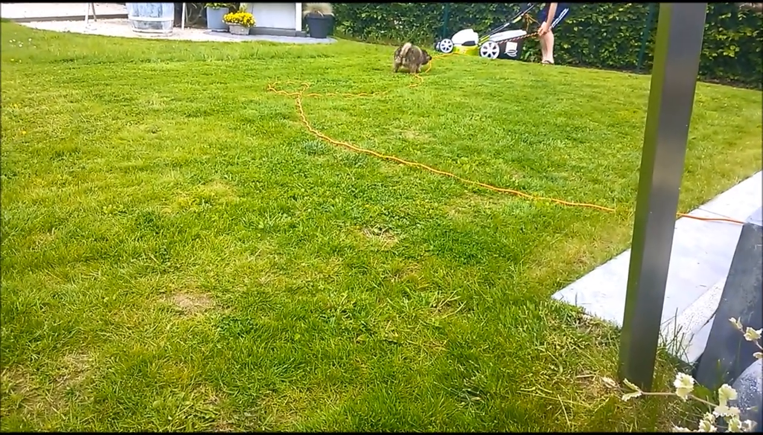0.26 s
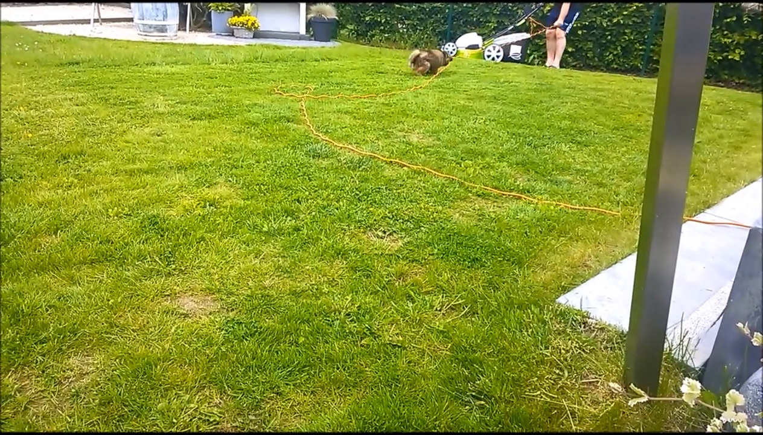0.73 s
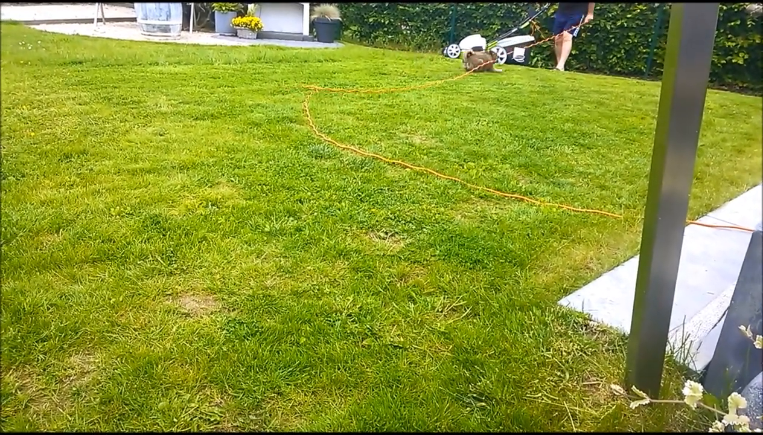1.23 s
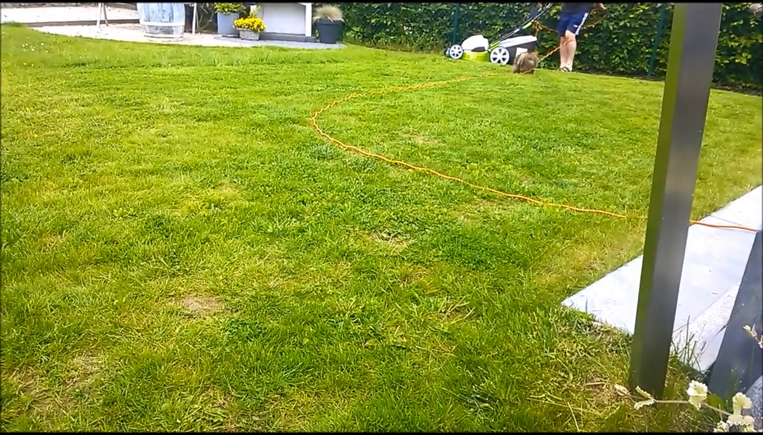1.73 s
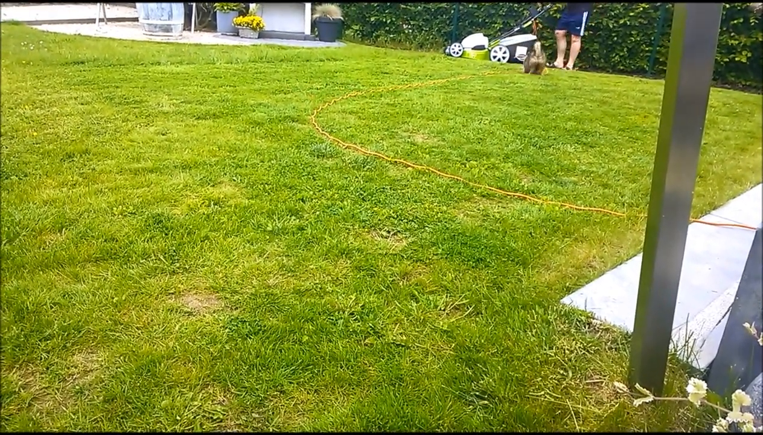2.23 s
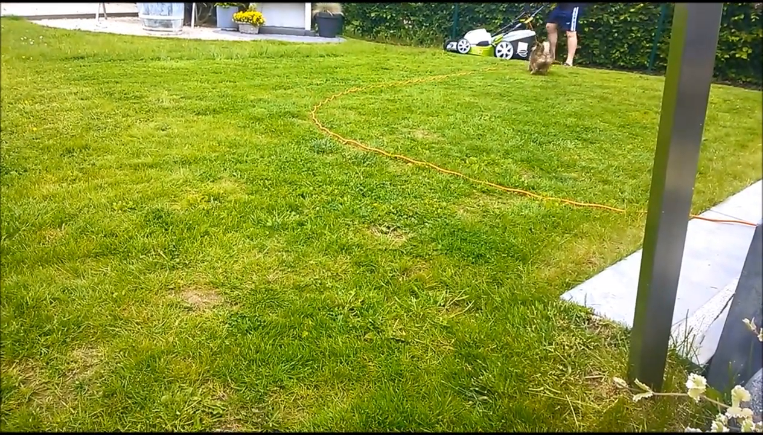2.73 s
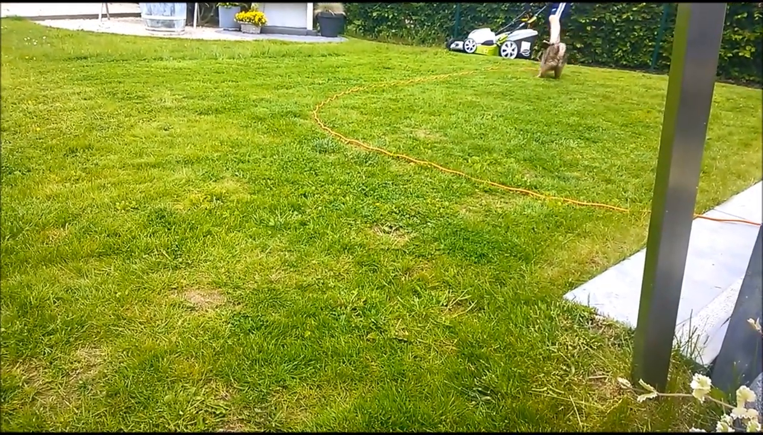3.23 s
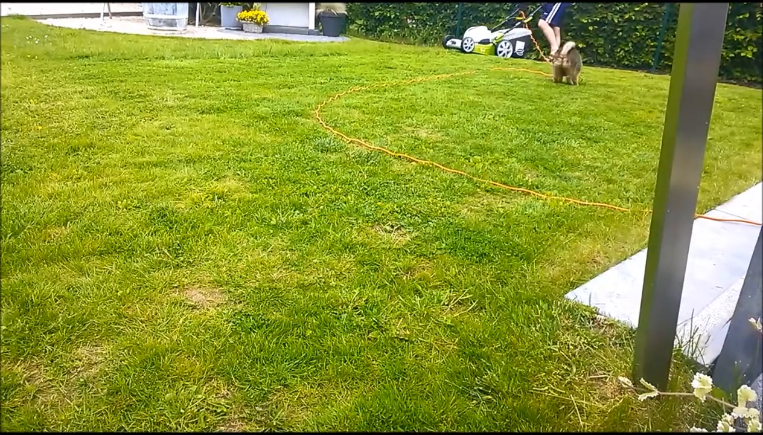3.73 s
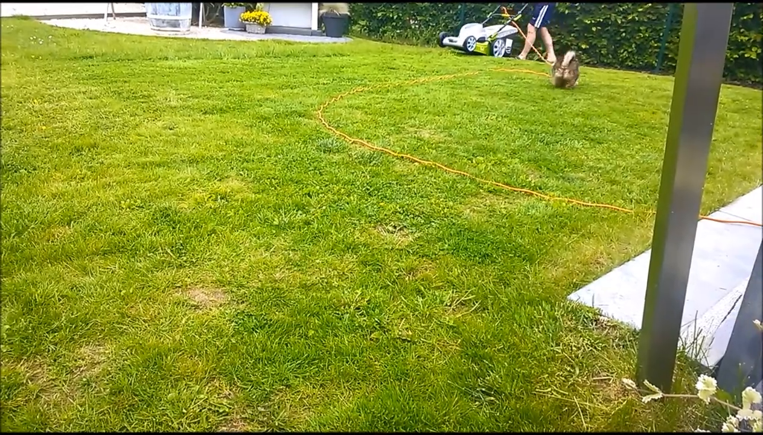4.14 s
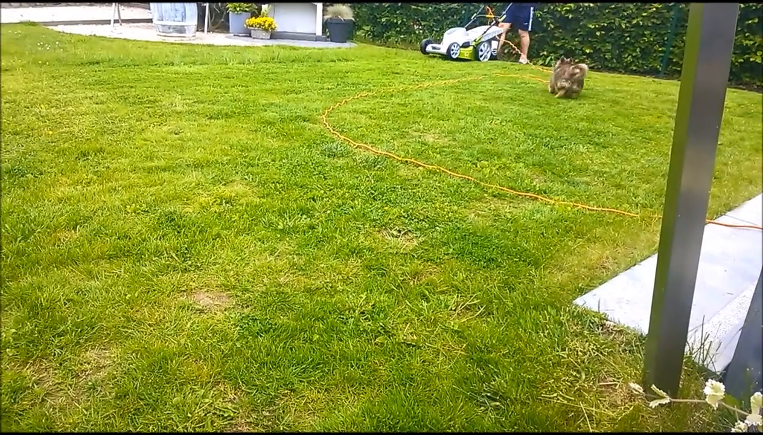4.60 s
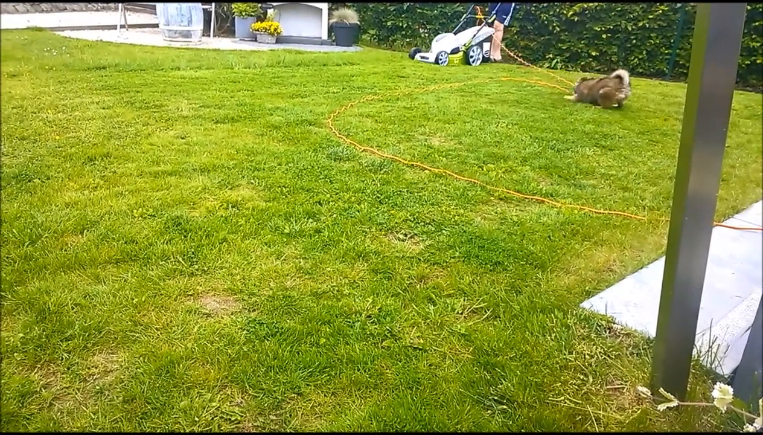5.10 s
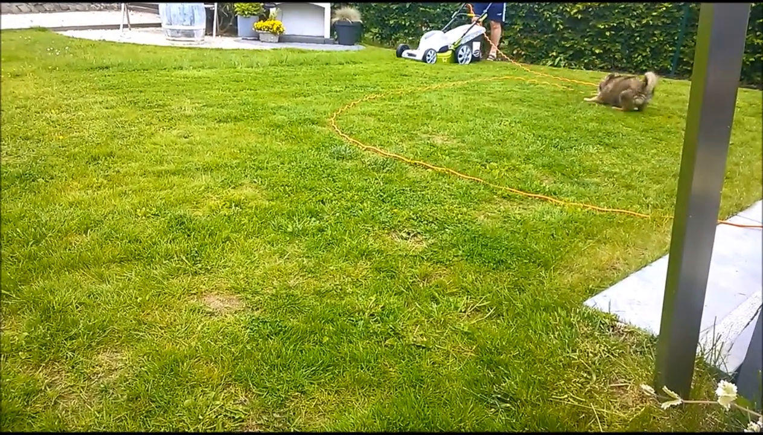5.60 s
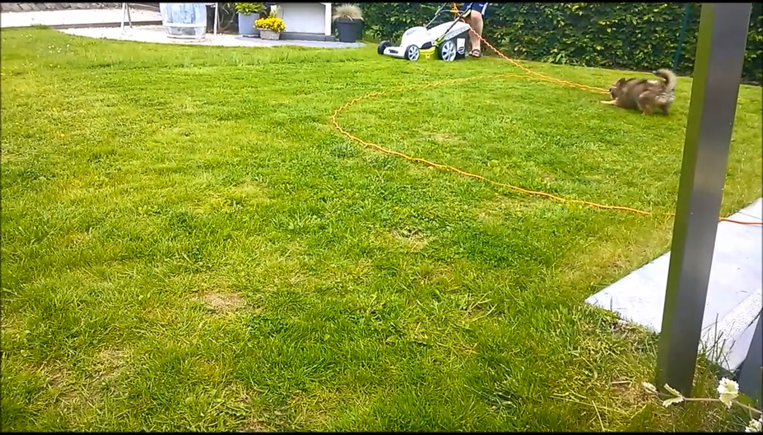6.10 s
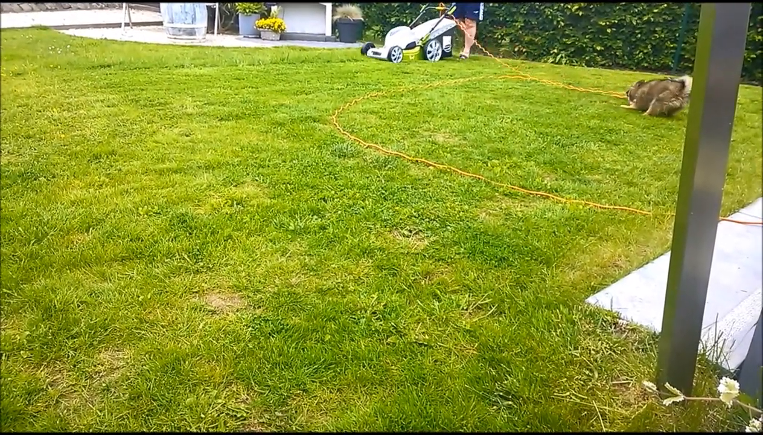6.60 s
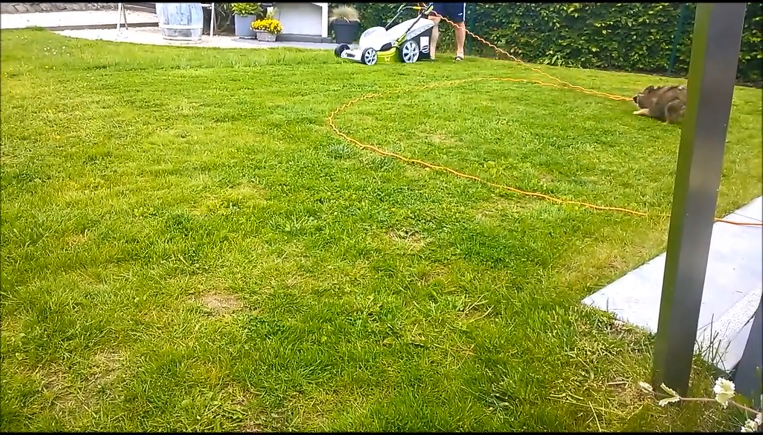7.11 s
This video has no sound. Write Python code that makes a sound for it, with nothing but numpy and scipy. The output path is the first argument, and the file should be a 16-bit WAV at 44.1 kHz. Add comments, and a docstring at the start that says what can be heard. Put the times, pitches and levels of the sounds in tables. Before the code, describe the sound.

Steady low hum and fan whoosh of an electric mower cutting grass, growing raspier halfway, over faint garden hiss.

```python
"""A corded electric mower is pushed along a hedge across a lawn and turns round about 4 s in.
Its blade hums and buzzes at about 97 passes a second, chops the air in the deck and rasps through grass,
spraying clippings against the housing, while the motor's fan blows. The partials swell and fade as it
moves. Faint far-off chirps sit in a soft garden hiss; late on, a short swish and two dry knocks sound."""
import sys
import numpy as np
from scipy import signal
from scipy.fft import rfft, irfft, next_fast_len
from scipy.io import wavfile
from scipy.ndimage import uniform_filter1d

SR = 44100
rng = np.random.default_rng(int(sys.argv[2]) if len(sys.argv) > 2 else 0)


def put_to_file(sound):
    """Save the sound as 16-bit audio at rate SR, in the file named by the first command-line argument."""
    columns = np.atleast_2d(sound).T  # one column per channel
    safe = np.clip(columns, -1, 1)
    whole_steps = np.round(safe * 32767)
    wavfile.write(sys.argv[1], SR, whole_steps.astype(np.int16))


N = 324130


def undb(db):
    """Decibels to gain."""
    return 10 ** (np.asarray(db) / 20)


def unit(x):
    """Scale to rms 1."""
    return x / np.sqrt(np.mean(x ** 2))


def curves(table):
    """Automation lanes: a table's columns, joined by straight lines in time."""
    times, *columns = np.transpose(table)
    return [np.interp(np.arange(N) / SR, times, column) for column in columns]


def colour(x, spectrum):
    """EQ a sound through (frequency [Hz], gain [dB]) points, then scale to rms 1."""
    hz, db = np.transpose(spectrum)
    size = next_fast_len(N)
    bin_hz = np.maximum(np.arange(size // 2 + 1) * SR / size, 1)
    gain = undb(np.interp(np.log(bin_hz), np.log(hz), db))
    return unit(irfft(rfft(x, size) * gain, size)[:N])


def noise():
    """White noise."""
    return rng.standard_normal(N)


def walk(rate):
    """Smooth random modulation at rms 1, with `rate` new values a second."""
    hold = max(int(SR / rate), 1)
    steps = noise()[np.arange(N) // hold]
    return unit(uniform_filter1d(uniform_filter1d(steps, hold), hold))


def bump(s, half):
    """A rounded envelope from 0 to 1 and back, centred on time s."""
    return np.exp(-np.abs((np.arange(N) / SR - s) / half) ** 3)


def swells(table):
    """The summed gain of (time [s], half length [s], level [dB]) swells."""
    return sum(undb(db) * bump(s, half) for s, half, db in table)


def bursts(table, spectrum):
    """Short flickering rustles of one colour that swell and die away."""
    return swells(table) * colour(noise() * undb(2.0 * walk(250)), spectrum)


def chop(phase, depth):
    """A pulse in level once a cycle, as the blade tip sweeps by the outlet."""
    return unit(np.exp(depth * np.cos(phase)))


def partial(phase, multiple, db, flutter):
    """One tone of the blade's suction pulse; eddies shake its level."""
    smear_rad = 0.296 * multiple ** 2  # the deck delays higher partials more
    drift_rad = .9 * walk(0.804)  # the paths over the lawn change as the mower moves
    amplitude = np.sqrt(2) * undb(db) * (1 + flutter * walk(35))
    return -amplitude * np.cos(multiple * phase - smear_rad - drift_rad)


# fader ride on the hum's fundamental: (time [s], level [dB])
HUM_LEVEL = [(0.06, -26.5), (2.62, -26.5), (2.88, -29.5), (3.87, -28.5), (4.11, -23.5), (4.74, -26),
             (4.88, -32.5), (5.42, -35.5), (5.91, -26.5), (6.25, -31), (6.37, -28), (6.45, -31),
             (6.77, -29.5), (6.94, -25.5), (7.0, -30.5), (7.3, -24)]
# fader ride on its octave: (time [s], level [dB])
OCTAVE_LEVEL = [(0.06, -29.5), (2.36, -29), (2.66, -25.5), (3.67, -27.5), (3.73, -30), (3.93, -23.5),
                (4.13, -28.5), (4.48, -31), (5.55, -25), (5.7, -27), (5.97, -24.5), (6.03, -28.5),
                (6.41, -34.5), (6.45, -47), (6.55, -33.5), (7.06, -25.5), (7.14, -29), (7.3, -25.5)]


def blade_hum(phase):
    """The low body of the sound: the two lowest partials of the passing blade."""
    hum_db, = curves(HUM_LEVEL)
    octave_db, = curves(OCTAVE_LEVEL)
    sway_db = 0.17 * walk(8.7)  # the mower bobs over the lawn
    fundamental = partial(phase, 1, hum_db + sway_db, flutter=0.048)
    return fundamental + partial(phase, 2, octave_db + sway_db, flutter=0.029)


# the buzz's partials: (harmonic [n], level [dB], swell share [dB/dB], turn change [dB], flutter [0-1])
BUZZ_PARTIALS = [(3, -46.5, 0.66, 9, .07), (4, -39.5, 0.86, -5, .06), (5, -44.5, 2.02, -2, .08),
                 (6, -49, 2, 5, 0.07), (7, -59, 1.5, 5, .3), (8, -53, 0.58, 4.5, .3), (9, -61, 0.5, 6, .35),
                 (12, -73, 0, 8, .7), (13, -74, 0.5, 7.5, .7)]
# dips where reflections cancel a partial: (time [s], half length [s], harmonic [n], depth [dB])
BUZZ_DIPS = [(0.097, 0.2, 6, -5), (.48, .22, 3, -6), (2.47, 0.061, 3, -9), (3.68, 0.22, 6, -2.5),
             (5.02, 0.11, 3, -6.5), (5.17, .08, 5, -8), (5.65, 0.28, 3, -3.5), (6.044, .14, 4, -21),
             (5, 0.11, 6, -10), (7.05, .05, 3, -5)]


def blade_buzz(phase, swell_db, turned):
    """The rough edge of the blade's slap: upper partials that follow the swell and the turn."""
    buzz = 0
    for harmonic, db, share, turn_db, flutter in BUZZ_PARTIALS:
        dip_db = sum(depth * bump(s, half) for s, half, which, depth in BUZZ_DIPS if which == harmonic)
        wander_db = 1.22 * walk(9)
        level_db = db + share * swell_db + turn_db * turned + dip_db + wander_db
        buzz = buzz + partial(phase, harmonic, level_db, flutter)
    return buzz


# tones off the harmonic series: (multiple of the pass rate [ratio], level [dB])
SHAKE_TONES = [(.638, -50.5), (1.501, -52.5), (2.5, -58), (4.5, -57)]


def shake(phase):
    """Weak, fluttering tones from the unbalanced blade and the drive."""
    return sum(partial(phase, multiple, db, flutter=0.33) for multiple, db in SHAKE_TONES)


# EQ of the deck's low rumble, its midrange rush and the outlet's roar: (frequency [Hz], gain [dB])
RUMBLE_EQ = [(20, -13.5), (35, -11), (55, 9.5), (85, 1), (160, 11), (240, 3.5), (310, -6), (460, 1),
             (550, -7), (650, -15.5), (1000, -68), (4000, -88)]
RUSH_EQ = [(100, -14.5), (250, 2), (480, 3), (560, 1.5), (660, -5), (800, -2.5), (920, -5.5), (1050, -9.5),
           (1260, -10.5), (1400, -25), (2000, -38.5), (6000, -81.5)]
ROAR_EQ = [(150, -41), (500, -14.5), (700, -3), (840, 13), (1020, 4), (1200, -11.5), (1500, -34.5),
           (4000, -81)]


def deck_air(phase, swell_db, turned):
    """Turbulence under the deck, chopped by the blade; the outlet's roar swells fastest."""
    rumble = colour(noise() * chop(phase, depth=0.11), RUMBLE_EQ)
    rumble *= undb(-42.0 + 0.61 * swell_db - 0.97 * turned)
    depth = np.clip(0.31 + 0.036 * swell_db, 0, 1)  # the puffs sharpen as the rush grows
    puffs = undb(1.1 * walk(90))
    rush = colour(noise() * chop(phase, depth) * puffs, RUSH_EQ)
    rush *= undb(-43.5 + 1.1 * swell_db - 2 * turned)
    roar = colour(noise() * chop(phase, depth=0.22), ROAR_EQ)
    roar *= undb(-58 + 1.8 * swell_db + 5 * turned)
    return rumble + rush + roar


def reflected(x, delay_s=.0028, gain=0.25):
    """A close reflection, its path drifting as the mower moves, combs the noise and makes it hollow."""
    delay_samples = SR * delay_s * (1 + 0.056 * walk(.7))
    echo = np.interp(np.arange(N) - delay_samples, np.arange(N), x)
    return (x + gain * echo) / np.hypot(1, gain)


# EQ of the fan's nasal whoosh: (frequency [Hz], gain [dB])
FAN_EQ = [(800, -2.5), (1230, 11), (1450, 2.5), (2030, -0.5), (2170, -6), (2400, -5), (2750, -8.5),
          (2950, -7), (3900, -13), (4550, -14.5), (5250, -28.5), (6100, -29.5), (6800, -34.5), (12000, -45)]


def cooling_fan(swell_db, turned):
    """Slightly fluttering air from the motor's cooling fan."""
    air = colour(noise() * undb(.6 * walk(50)), FAN_EQ)
    return air * undb(-59.0 + 0.31 * swell_db + 1.2 * turned)


# fader ride on the rasp, up where the blade meets more grass: (time [s], level [dB])
RASP_LEVEL = [(0, -81.5), (3.3, -79), (3.8, -72), (4.3, -69.5), (4.8, -76.5), (4.88, -56.5), (5.1, -61),
              (5.35, -59), (5.58, -62), (5.95, -58), (6.2, -56.5), (6.48, -57.5), (6.57, -60.5),
              (7.35, -60.5)]
# spurts of clippings from thicker tufts: (time [s], half length [s], level [dB])
SPURTS = [(4.18, 0.089, -75), (4.34, .14, -73.5), (4.58, 0.36, -75.5), (4.64, .04, -73),
          (4.96, 0.15, -69.5), (5.26, .17, -74.5), (6.17, .05, -75), (6.36, 0.14, -75), (6.69, .028, -76),
          (6.95, .05, -82), (7.13, .025, -77), (7.23, .022, -76)]
# EQ of the gritty rasp and the bright spray: (frequency [Hz], gain [dB])
RASP_EQ = [(1000, -11.5), (1480, -4), (1700, 3), (2200, -0.5), (2500, -1.5), (2850, -10), (2980, -10.5),
           (3150, -16), (3430, -8), (3900, -10), (4500, -23), (5200, -25), (7000, -39), (12000, -58.5)]
SPRAY_EQ = [(3000, -12), (4600, -1), (5280, -7), (5600, 1.5), (6150, 2.5), (6850, -5.5), (7100, -5.5),
            (7900, -14), (8500, -16), (9300, -31), (10300, -17.5), (12000, -37)]


def grass(phase):
    """Countless stalks are cut on each pass; clippings spray against the housing once a revolution."""
    rasp_db, = curves(RASP_LEVEL)
    spray_offset_db, idle_db = -15.5, -87.5  # the spray sits under the rasp, above an idle hiss
    spray_gain = np.hypot(undb(idle_db), undb(rasp_db + spray_offset_db) + swells(SPURTS))
    cuts = noise() * undb(1.4 * walk(600)) * chop(phase, depth=0.13)
    spray = noise() * undb(.9 * walk(45)) * chop(phase / 2, depth=.07)
    return colour(cuts, RASP_EQ) * undb(rasp_db + 0.64) + colour(spray, SPRAY_EQ) * spray_gain


# the blade's pitch, sagging in thick grass: (time [s], pass rate [Hz])
BLADE_RATE = [(0, 97.8), (2.5, 97.8), (3.25, 97.55), (3.55, 97), (4.75, 97.35), (5.05, 96), (5.75, 97.15),
              (6.3, 96.55), (6.6, 97), (7.35, 97)]
# swell as the mower moves about; buzz, air and fan each scale it: (time [s], swell [dB])
DECK_SWELL = [(0, 0.5), (2.35, -0.5), (2.65, 1.7), (2.9, 2.4), (3.55, 1.86), (3.85, 3.5), (4.08, 5.5),
              (4.8, 5.5), (5.0, 4.5), (5.15, 2.1), (5.7, 3.5), (6.05, 0.8), (6.6, 2.16), (7.08, 1),
              (7.3, 3)]


def mower():
    """Blade, air, fan and grass together; the tone shifts as the deck's other side comes round."""
    pass_hz, = curves(BLADE_RATE)
    swell_db, = curves(DECK_SWELL)
    turn_middle_s, turn_length_s = 3.93, 2.4
    turned = np.clip(.5 + (np.arange(N) / SR - turn_middle_s) / turn_length_s, 0, 1)
    wobble = 1 + .0008 * walk(25)  # tufts brake the blade a little
    phase = 2 * np.pi * np.cumsum(pass_hz * wobble) / SR
    blade = blade_hum(phase) + blade_buzz(phase, swell_db, turned) + shake(phase)
    air = deck_air(phase, swell_db, turned) + reflected(cooling_fan(swell_db, turned))
    return blade + air + reflected(grass(phase))


# EQ of the background bed: (frequency [Hz], gain [dB])
GARDEN_EQ = [(30, 9.5), (1000, 7), (5000, 4.5), (8000, -0.5), (12000, -0.5), (16000, -1.5)]


def garden_hiss():
    """A faint, even bed of outdoor noise."""
    return undb(-82.0) * colour(noise(), GARDEN_EQ)


# chirp cues: (time [s], half length [s], level [dB])
CHIRP_CUES = [(.78, 0.023, -81), (1.25, 0.032, -87), (1.64, 0.028, -80)]
# their thin band near 5 kHz: (frequency [Hz], gain [dB])
CHIRP_EQ = [(4300, -37.5), (5000, 4), (5500, 1), (5900, -6), (6500, -28)]


def chirps():
    """Three faint, distant chirps: blips of narrow-band noise."""
    return bursts(CHIRP_CUES, CHIRP_EQ)


# swish cue: (time [s], half length [s], level [dB])
SWISH_CUES = [(4.908, 0.056, -62)]
# its broad, airy EQ: (frequency [Hz], gain [dB])
SWISH_EQ = [(1000, -5), (2200, 0), (4000, -5), (6000, 4), (7500, -0.5), (9000, -8), (12000, -9.5),
            (15000, -11)]


def swish():
    """A tuft swishes in one short, bright rustle."""
    return bursts(SWISH_CUES, SWISH_EQ)


# a soft knock, then a hard one: (time [s], strike level [dB])
KNOCK_CUES = [(6.879, -26.5), (7.185, -13.2)]
# their ring: (frequency [Hz], gain [dB], time to fall 60 dB [s])
KNOCK_RING = [(944, 0.5, 0.0077), (1651, -10.5, 0.0058), (2270, -12, 0.00099)]


def knocks(contact_s=.00035):
    """Small dull contacts, damped within a few cycles."""
    ring = np.zeros(N)
    for s, db in KNOCK_CUES:
        age = np.maximum(np.arange(N) / SR - s, 0)
        for hz, mode_db, t60 in KNOCK_RING:
            decay = np.exp(-np.log(1000) * age / t60)
            ring -= undb(db + mode_db) * np.sin(2 * np.pi * hz * age) * decay
    push = np.hanning(int(contact_s * SR))  # the contact lasts a moment, which rounds the attack
    return np.convolve(ring, push / push.sum(), "same")


def scene():
    """The mono mix: the mower over the garden bed, with chirps, swish and knocks."""
    return (mower() + garden_hiss() + chirps() + swish() + knocks())[None]


def record(dry):
    """A steep low-pass trims the very top."""
    cutoff_hz = 15700
    return signal.sosfilt(signal.ellip(8, .2, 70, cutoff_hz, fs=SR, output="sos"), dry)


dry = scene()
out = record(dry)
put_to_file(out)
```